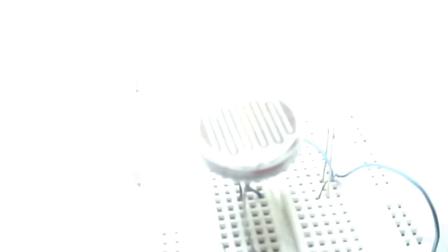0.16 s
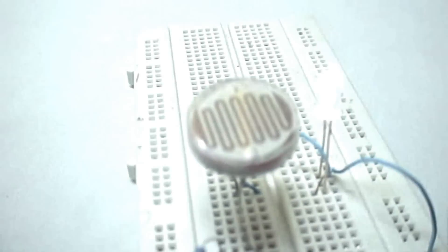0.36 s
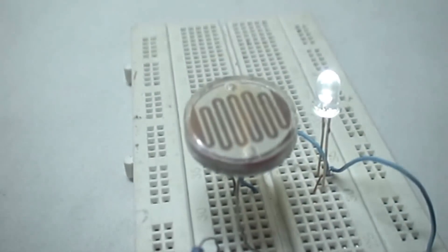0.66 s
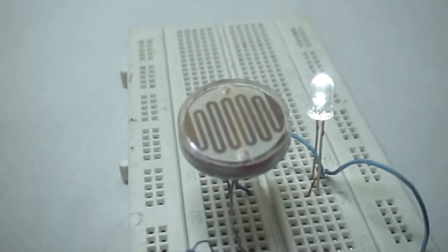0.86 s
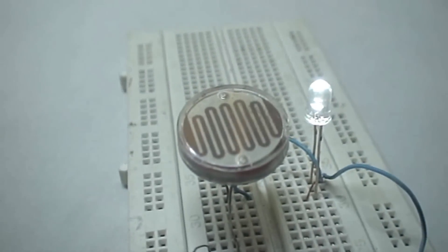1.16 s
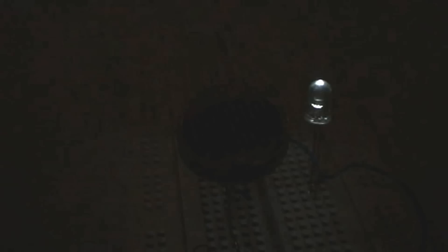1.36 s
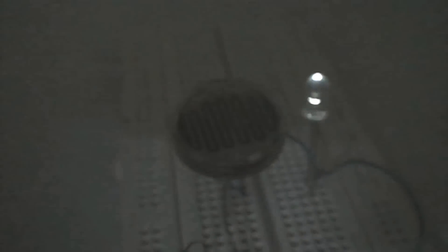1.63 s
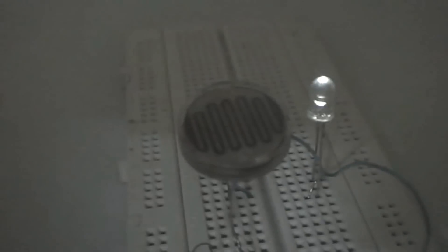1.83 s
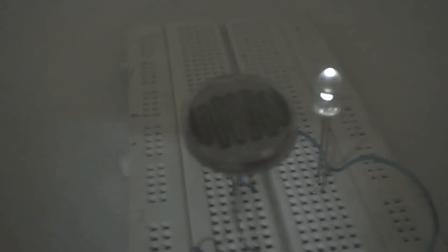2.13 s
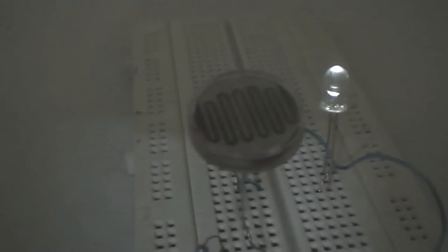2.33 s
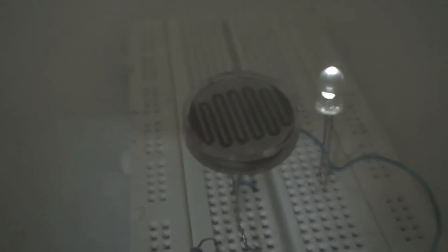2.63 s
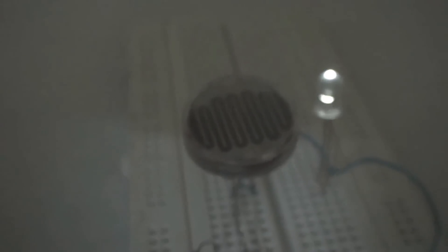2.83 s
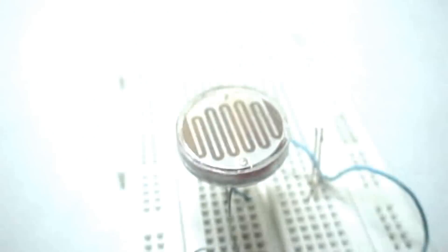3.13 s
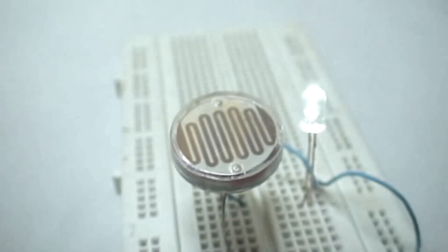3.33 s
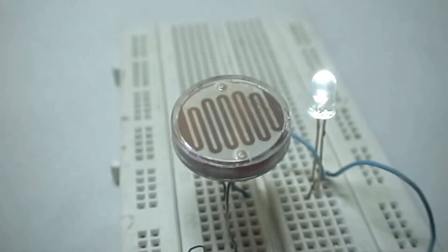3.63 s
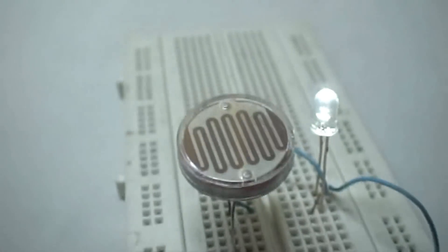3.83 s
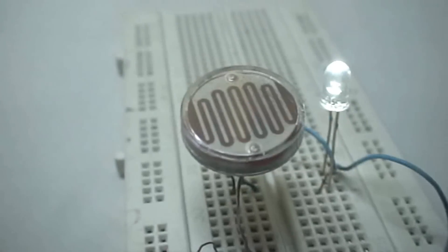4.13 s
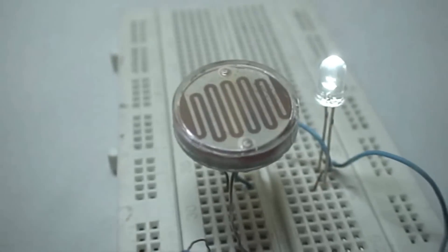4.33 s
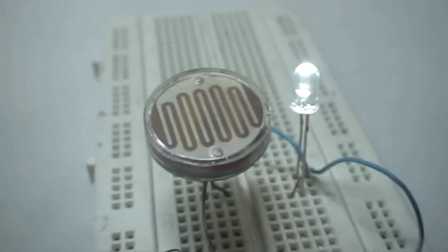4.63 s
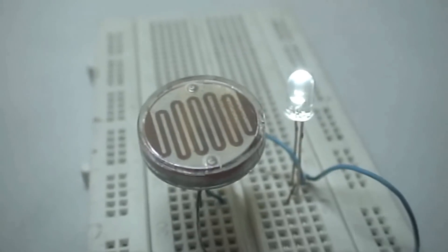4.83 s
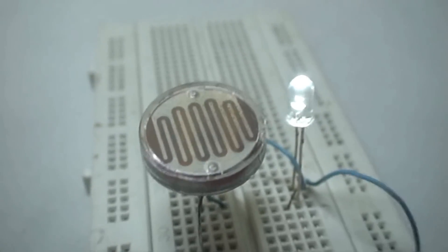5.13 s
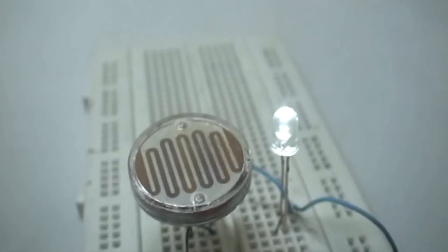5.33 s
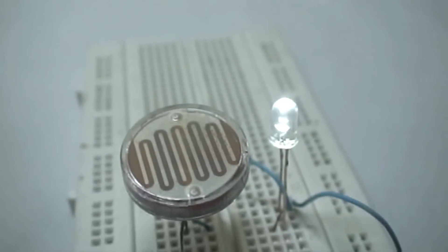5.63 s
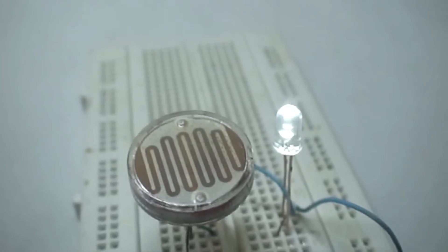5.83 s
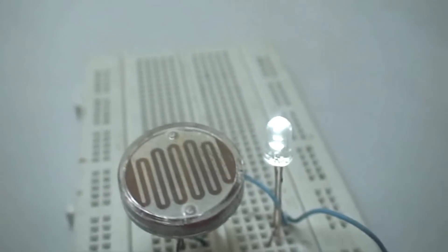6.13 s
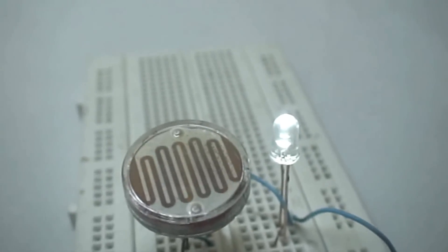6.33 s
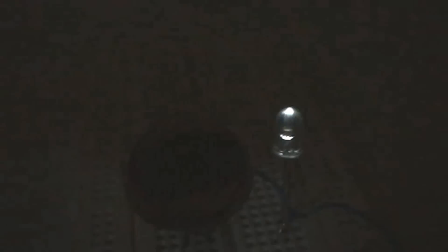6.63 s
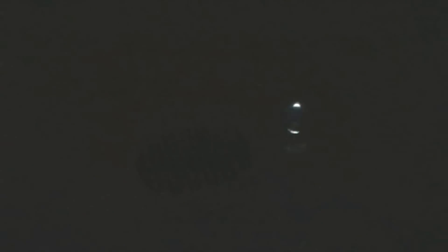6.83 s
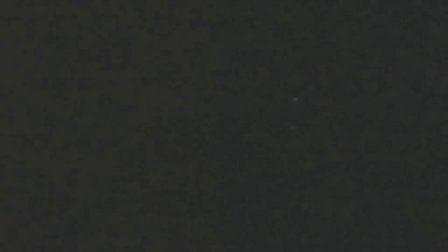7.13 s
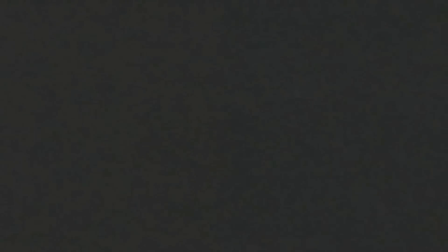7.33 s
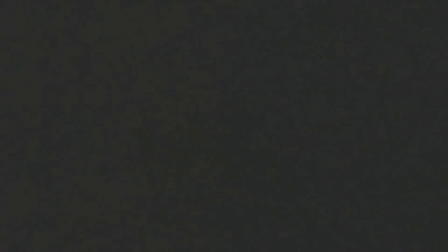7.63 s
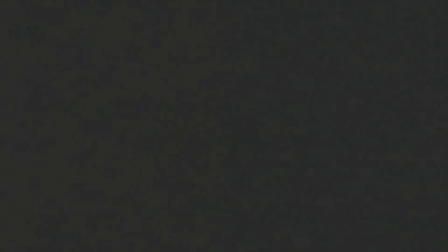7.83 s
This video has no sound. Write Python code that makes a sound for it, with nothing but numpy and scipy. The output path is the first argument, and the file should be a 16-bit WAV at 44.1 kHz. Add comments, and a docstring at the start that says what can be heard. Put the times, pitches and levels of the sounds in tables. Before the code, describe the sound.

A small room hisses and hums softly for about eight seconds, with a small motor whining faintly throughout. At 0.2 seconds a light switch close to the microphone snaps on, sharp and bright, with a light thud of the hand on the wall. At 1.4 seconds it is eased off with a soft tick. It snaps on again at 3 seconds. After each snap the background dips slightly and creeps back. Small ticks and very faint plastic squeaks fall in between. Three different switches farther away clack at 4.4, 5.8 and 6.9 seconds, heard mostly as short room echo, the middle one loudest and slightly doubled. A faint low hum fades in around 5.1 seconds and out by 7.1. At about 6.7 seconds the near switch is eased off again, with soft ticks and dull bumps on its box. Only the hiss and whine remain.

```python
"""A small room hisses and hums softly, and a small motor whines all the way through.
A nearby light switch snaps on, is eased off, and snaps on again at 3 s, with ticks and knocks of the hand.
Each snap rattles the contacts and rings the switch; gain control then turns everything down for a while.
From 4.4 s three farther switches clack, heard mostly as room echo, and a low hum comes and goes.
Just before the last clack, the nearby switch is eased off again."""
import sys
import numpy as np
from scipy import signal
from scipy.fft import rfft, irfft
from scipy.io import wavfile
from scipy.ndimage import uniform_filter1d

SR = 44100
rng = np.random.default_rng(int(sys.argv[2]) if len(sys.argv) > 2 else 0)


def materialize(psi):
    """Save the field psi as 16-bit PCM at rate SR to the path in sys.argv[1].

    A 1-D psi becomes a single channel; in a 2-D psi each row is a channel.
    """
    bounded = np.clip(np.atleast_2d(psi).T, -1, 1)
    quanta = np.round(bounded * 32767).astype(np.int16)
    wavfile.write(sys.argv[1], SR, quanta)


N = 352359
HIT_SAMPLES = 32768
# time and frequency axes: for the whole scene, and for a single hit
SCENE_T, SCENE_HZ = np.arange(N) / SR, np.fft.rfftfreq(N, 1 / SR)
HIT_T, HIT_HZ = np.arange(HIT_SAMPLES) / SR, np.fft.rfftfreq(HIT_SAMPLES, 1 / SR)

# how left and right differ; the top treble is the same in both:
# (frequency [Hz], part a quarter cycle ahead [dB], unrelated part [dB])
LEFT_RIGHT_DIFFERENCE = [(60.6, -20, -19.5), (182, -5.5, -15), (430, 0, -5), (975, -0.5, -6),
                         (2010, -3, -1), (3160, 0.5, -12.5), (5000, -6.5, -2), (7500, -1, -13.5),
                         (10700, -9, 2.5), (12500, -39, -37)]
# echoes off the nearby desk and wall: (frequency [Hz], level [dB])
DESK_ECHO = [(150, 14.5), (400, 2.5), (1000, -0.5), (3000, 1.5), (5000, -4.5), (7000, -8), (15000, -6.5)]
# the room's echo: (frequency [Hz], time to fade by 60 dB [s], level [dB])
ROOM_ECHO = [(120, 0.68, 0), (496, 0.23, 4), (2000, 0.32, 1), (5000, 0.32, -1), (9000, 0.3, -2),
             (15000, 0.22, 0.5)]

# the hiss of the room's air: (frequency [Hz], relative level [dB])
AIR_SPECTRUM = [(15, -64), (25, -23), (75, -5.5), (129, -3.5), (198, -3.5), (227, -9.5), (349, -8),
                (378, -11), (582, -10), (1340, -16.5), (1450, -18.5), (1570, -18), (3340, -25.5),
                (9550, -30.5), (15500, -26.5)]
# steady tones of appliances: (pitch [Hz], level [dB], waver [Hz])
APPLIANCE_TONES = [(130.8, -67.5, 5.38), (594, -76, 14.57), (14300, -91, 5)]
# the motor's whine at its usual speed: (pitch [Hz], level [dB], waver [Hz])
MOTOR_TONES = [(1428, -69.3, 1.4), (1464, -76.5, 3.14), (14260, -81, 15)]
# the motor briefly speeds up: (time of the peak [s], half length [s], extra speed [fraction])
MOTOR_SURGES = [(1.646, 0.2207, 0.00904), (5.347, 0.218, 0.0119)]

# faint squeaks and rubs: (time [s], length [s], pitch [Hz], level [dB], width [Hz])
PLASTIC_SQUEAKS = [(2.158, 0.1, 4860, -73, 110), (4.21, 0.25, 2180, -65.5, 450),
                   (5.248, 0.1, 5200, -74, 260)]
# the hand thuds into the wall: (time [s], level [dB], treble tilt [dB per octave])
WALL_THUDS = [(0.164, -47.5, -1.5), (1.414, -50.5, -3), (3.019, -44, 0), (3.068, -46.5, -3),
              (6.535, -56, -3), (6.690, -50.5, -2.5)]
# the wall's modes, the pitches it rings at: (pitch [Hz], level [dB], time to fade by 60 dB [s])
WALL_MODES = [(69.4, -4.5, 0.32), (108, 1, 0.26), (168.3, -2, 0.22), (311, -0.5, .08), (395, 1, 0.08)]
# the hand bumps a switch box: (time [s], level [dB], pitch [Hz])
BOX_BUMPS = [(0.165, -43, 410), (5.821, -41.5, 366), (6.731, -35.5, 343), (6.81, -42.5, 409)]
# how the box rings: (multiple of the bump's pitch [ratio], level [dB], time to fade by 60 dB [s])
BOX_MODES = [(.55, -7, 0.086), (1, 2.5, 0.034), (1.4, -14, .03)]

# the far switches clack:
# (time [s], level [dB], treble tilt [dB per octave], lead-in compared with clack [dB], switch [index])
FAR_CLACKS = [(4.4074, -28.5, 0.8, -12, 0), (5.8116, -23.5, 1, -10.5, 1), (5.8280, -33, 0.5, -21, 1),
              (6.9318, -32.5, 1.3, -12, 2)]
# how far switches 0, 1 and 2 ring: (pitch [Hz], width [Hz], level [dB])
HOLLOW_SWITCH_MODES = [(330, 70, -10.0), (670, 160, -20.0), (980, 70, -13.0), (1340, 150, -8.0),
                       (1620, 70, -11.5), (2100, 140, -4.0), (2290, 70, -6.0), (2700, 100, -5.0),
                       (3340, 90, -1.5), (3610, 110, -1.5), (4810, 190, -10.0), (5640, 540, -17.5),
                       (6890, 640, -14.0), (8360, 230, -4.0), (8780, 110, -5.5), (9410, 380, -10.5),
                       (12140, 240, -17.0), (13270, 490, -20.0)]
HARD_SWITCH_MODES = [(350, 70, -6.5), (620, 80, -6.0), (920, 70, -11.5), (1430, 250, -6.5),
                     (1760, 70, -6.0), (2180, 300, -4.0), (2720, 340, -8.0), (3350, 110, -3.0),
                     (3720, 220, -8.5), (4350, 340, -4.0), (4920, 490, -10.0), (6280, 410, -6.0),
                     (7020, 300, -8.5), (7510, 350, -10.5), (8220, 80, -4.0), (8940, 510, -5.5),
                     (10310, 500, -11.0), (11770, 460, -11.5), (13270, 650, -11.5), (15060, 800, -16.0)]
LIGHT_SWITCH_MODES = [(290, 90, -12.5), (600, 160, -15.5), (1360, 220, -10.5), (1690, 120, -9.0),
                      (2320, 170, -5.5), (2780, 70, -5.0), (3060, 260, -8.0), (3810, 130, -6.0),
                      (4050, 130, -10.0), (5340, 510, -17.0), (7150, 390, -13.5), (8370, 280, -3.0),
                      (9280, 100, -11.0), (9580, 250, -10.0), (11680, 100, -21.0), (12580, 540, -18.0)]

# soft ticks near the switch; the first is a short echo of the snap:
# (time [s], level [dB], treble tilt [dB per octave], ping pitch [Hz], ping level [dB])
SOFT_TICKS = [(0.1834, -49, -4, 4800, -6), (0.2707, -46.5, 0, 1610, 10), (1.0467, -54, -0.5, 3680, 3),
              (1.4180, -45.5, 2, 1780, 8), (1.6435, -52.5, -3, 2100, -8), (2.9456, -55, 0, 2300, -15),
              (3.1375, -49, -1, 13400, 17), (3.5488, -54, 0.5, 3570, 9), (6.6969, -41, 2.3, 1890, 6),
              (6.8003, -43, -1, 4050, 3.5)]
# how the rocker, the part you press, rings: (pitch [Hz], width [Hz], level [dB])
ROCKER_MODES = [(400, 240, 4), (980, 160, 4), (1500, 490, 1), (1780, 390, -2), (2260, 190, 4.5),
                (2950, 290, -3), (3650, 330, -9.5), (4260, 370, -7.5), (5800, 500, -16.5), (6580, 480, -5),
                (8500, 1100, -12.5), (10400, 500, -42), (12200, 1400, -18)]
# the near switch snaps on: (time [s], level [dB], treble tilt [dB per octave], contact bounce [s])
NEAR_SNAPS = [(0.1604, -20.5, -0.14, 0.0057), (3.0169, -19.5, 0.1, 0.0044)]
# how a snap rings: (pitch [Hz], width [Hz], level in first snap [dB], level in second snap [dB])
SNAP_MODES = [(400, 80, -11.5, -13.5), (860, 70, -16.0, -12.5), (1030, 150, -9.0, -11.0),
              (1360, 70, -7.0, -7.5), (1610, 180, -16.0, -11.5), (2370, 270, -14.0, -14.5),
              (2680, 70, -10.0, -5.0), (3000, 140, -9.0, -9.0), (3250, 70, -11.0, -26.0),
              (3760, 360, -13.5, -12.0), (4190, 90, -15.5, -13.0), (4520, 130, -6.0, -6.0),
              (4870, 170, -3.0, -7.5), (5250, 190, -9.5, -10.5), (6380, 130, -12.0, -9.0),
              (6840, 140, -5.0, -7.5), (7680, 500, -13.5, -12.0), (8670, 180, -10.0, -13.0),
              (10120, 720, -11.5, -16.0), (10340, 220, -11.0, -3.0), (11750, 440, -18.5, -14.0),
              (12000, 250, -16.5, -12.5), (12730, 270, -3.0, -12.0), (13320, 280, -8.5, -7.0),
              (14250, 300, -13.5, -12.0), (15880, 880, -13.5, -16.0)]


def amp(db):
    """Turns decibels into a factor to multiply by."""
    return 10 ** (np.asarray(db) / 20)


def unit_rms(x):
    """Scales a signal so that its average strength (rms) is one."""
    return x / np.sqrt(np.mean(abs(x) ** 2) + 1e-30)


def look_up(table, hz, column=1):
    """Reads a table at any frequency, gliding between its rows."""
    columns = np.transpose(table)
    return np.interp(np.log(hz + 1), np.log(columns[0] + 1), columns[column])


def add(mix, start_s, sound):
    """Mixes a sound in at the given time."""
    part = mix[:, round(start_s * SR):][:, :sound.shape[1]]
    part += sound[:, :part.shape[1]]


def stereo(pair, hz, treble_pan_db):
    """Left and right spectra from a sound and its scattered twin; the treble can lean to one side."""
    middle, scattered = pair
    side = 1j * amp(look_up(LEFT_RIGHT_DIFFERENCE, hz)) * middle
    side += amp(look_up(LEFT_RIGHT_DIFFERENCE, hz, column=2)) * scattered
    shade = amp(treble_pan_db / 2 * np.exp(-((hz - 7000) / 4500) ** 4))  # by the microphones' casing
    return np.array([(middle + side) * shade, (middle - side) / shade])


def straight_ahead(pair):
    """Puts a sound (row 0) and its scattered twin (row 1) in front of the microphones."""
    return irfft(stereo(rfft(pair), SCENE_HZ, treble_pan_db=0), N)


def tone(hz, waver_hz, flutter=0.2):
    """A tone whose pitch wanders and whose strength flutters."""
    turns = np.arange(0, SCENE_T[-1] + 1, 0.03)
    drift, strength = (np.interp(SCENE_T, turns, row) for row in rng.standard_normal((2, len(turns))))
    phase = 2 * np.pi * np.cumsum(hz + waver_hz * drift) / SR
    return unit_rms((1 + flutter * strength) * np.sin(phase))


def motor(wander=0.002194, turn_s=0.2):
    """A small motor's tones rise and fall together with its speed."""
    drift = np.interp(SCENE_T / turn_s, np.arange(100), rng.standard_normal(100))
    surges = sum(extra * np.exp(-((SCENE_T - peak_s) / half_s) ** 2)
                 for peak_s, half_s, extra in MOTOR_SURGES)
    speed = 1 + wander * drift + surges
    return sum(amp(db) * tone(hz * speed, waver_hz) for hz, db, waver_hz in MOTOR_TONES)


def hum(start_s=5.13, end_s=7.1, fade_s=0.25, db=-62.5):
    """A low hum fades in, holds and fades out."""
    fade = np.clip(np.minimum(SCENE_T - start_s, end_s - SCENE_T) / fade_s, 0, 1)
    return amp(db) * fade * tone(hz=166.6, waver_hz=2.82)


def background(air_db=-57.5):
    """The steady hiss of the air, with the appliances, the motor and the hum."""
    noise = rfft(rng.standard_normal((2, N)))
    air = irfft(noise * amp(look_up(AIR_SPECTRUM, SCENE_HZ)), N)
    appliances = sum(amp(db) * tone(hz, waver_hz) for hz, db, waver_hz in APPLIANCE_TONES)
    out = amp(air_db) * unit_rms(air)
    out[0] += appliances + motor() + hum()
    return straight_ahead(out)


def squeaks():
    """An uneven grip on plastic makes it ring around one pitch in a short, scratchy chirp."""
    out = np.zeros((2, N))
    for start_s, length_s, hz, db, width_hz in PLASTIC_SQUEAKS:
        peak = 1 / (1 + ((SCENE_HZ - hz) / width_hz) ** 2)
        scratch = unit_rms(irfft(rfft(rng.standard_normal(N)) * peak, N))
        swell = np.sin(np.pi * np.clip((SCENE_T - start_s) / length_s, 0, 1))
        out[0] += amp(db) * swell * scratch
    return straight_ahead(out)


def ring(hz, db, fade_s, attack_s=0.0004):
    """One low mode is struck and dies away, losing 60 dB in fade_s."""
    onset = 1 - np.exp(-HIT_T / attack_s)
    return amp(db - 60 * HIT_T / fade_s) * np.sin(2 * np.pi * hz * HIT_T) * onset


def knocks():
    """The hand makes the wall thud and bumps the switch box."""
    out = np.zeros((2, N))
    for start_s, db, tilt_db in WALL_THUDS:
        thud = sum(ring(hz, db + mode_db + tilt_db * np.log2(hz / 150), fade_s)
                   for hz, mode_db, fade_s in WALL_MODES)
        add(out, start_s, np.outer([1, 0], thud))  # row 0 only: no scattered twin
    for start_s, db, hz in BOX_BUMPS:
        bump = sum(ring(hz * multiple, db + mode_db, fade_s) for multiple, mode_db, fade_s in BOX_MODES)
        add(out, start_s, np.outer([1, 0], bump))
    return straight_ahead(out)


def body_gain(modes, tilt_db, floor_db, bass_hz=75):
    """How strongly a switch rings at each frequency: peaks on a floor, tilted brighter or duller."""
    peaks = sum(amp(db) ** 2 / (1 + ((HIT_HZ - hz) / width_hz) ** 2) ** 2 for hz, width_hz, db in modes)
    bass_loss = HIT_HZ ** 4 / (HIT_HZ ** 4 + bass_hz ** 4)  # a small body gives off no deep bass
    tilt = amp(tilt_db * np.log2((HIT_HZ + 300) / 3000))
    return np.sqrt((peaks + amp(floor_db) ** 2) * bass_loss) * tilt


def ringing_filter(gain):
    """Spectrum of a filter with this shape that rings only after the hit, never before."""
    log_gain = np.log(np.maximum(unit_rms(gain), 1e-5))
    mirrored = np.r_[log_gain, log_gain[-2:0:-1]]
    return np.exp(signal.hilbert(mirrored).conj()[:len(log_gain)])


def contact_bounce(length_s):
    """Spectrum of contacts rattling for a few milliseconds, about equally strong at all pitches."""
    spectrum = rfft(rng.standard_normal((2, HIT_SAMPLES)))
    window = np.exp(-(HIT_T / length_s) ** 4)
    for _ in range(6):  # even out the spectrum, then cut the sound short again
        flat = spectrum / (abs(spectrum) + 1e-12)
        spectrum = rfft(irfft(flat) * window)
    return unit_rms(spectrum)


def echoes(fade_table, rise_s):
    """Spectrum of many echoes that build up and die away, each band at its own speed."""
    hz, t, bands = signal.stft(rng.standard_normal((2, HIT_SAMPLES)), SR, nperseg=256)
    fade = amp(-60 * t / look_up(fade_table, hz)[:, None])
    tail = signal.istft(bands * fade, SR, nperseg=256)[1][:, :HIT_SAMPLES]
    return unit_rms(rfft(tail * (1 - np.exp(-HIT_T / rise_s))))


def strike(body, db, bounce_s, desk_db, room_db, rise_s, pan_db):
    """One hit: a brief rattle rings the switch's body, then the desk and the room echo it."""
    desk = echoes([(1, 0.075)], rise_s=0.0027)  # all bands fade in 0.075 s
    desk *= amp(desk_db + look_up(DESK_ECHO, HIT_HZ))
    room = amp(room_db + look_up(ROOM_ECHO, HIT_HZ, column=2)) * echoes(ROOM_ECHO, rise_s)
    reflected = stereo(desk + room, HIT_HZ, treble_pan_db=-1.5)
    direct = stereo(contact_bounce(bounce_s), HIT_HZ, pan_db)
    delay_s = 0.003604 / (1 + (HIT_HZ / 1100) ** 2)  # low bending waves leave the plate later
    bending = np.exp(-2j * np.pi * np.cumsum(delay_s) * SR / HIT_SAMPLES)
    spectrum = unit_rms(direct + reflected) * ringing_filter(body) * bending
    sound = irfft(spectrum)[:, :HIT_SAMPLES // 2]
    return amp(db) * np.sqrt(SR / 100) * sound  # db is the level with the energy spread over 10 ms


def far_switches(lead_in_s=0.0048):
    """Switches across the room clack after a faint lead-in; their echo outweighs the direct sound."""
    out = np.zeros((2, N))
    # (modes, floor between them [dB])
    switches = [(HOLLOW_SWITCH_MODES, -30), (HARD_SWITCH_MODES, -19), (LIGHT_SWITCH_MODES, -30)]
    for start_s, db, tilt_db, lead_in_db, which in FAR_CLACKS:
        modes, floor_db = switches[round(which)]
        body = body_gain(modes, tilt_db, floor_db)
        for hit_s, hit_db in (start_s - lead_in_s, db + lead_in_db), (start_s, db):
            hit = strike(body, hit_db, bounce_s=0.0132, desk_db=-10.5, room_db=5.0,
                         rise_s=0.0086, pan_db=-4.5)
            add(out, hit_s, hit)
    return out


def soft_ticks(ping_width_share=0.1):
    """Soft ticks near the switch ring at the rocker's pitches, each with its own ping."""
    out = np.zeros((2, N))
    for start_s, db, tilt_db, ping_hz, ping_db in SOFT_TICKS:
        ping = (ping_hz, ping_width_share * ping_hz, ping_db)
        body = body_gain(ROCKER_MODES + [ping], tilt_db, floor_db=-33)
        tick = strike(body, db, bounce_s=0.0055, desk_db=1.0, room_db=-13.5, rise_s=0.017, pan_db=4.0)
        add(out, start_s, tick)
    return out


def near_snaps(lead_in_s=0.0027, lead_in_db=-22):
    """The near switch's contacts slam shut; a faint lead-in softens the start of each snap."""
    out = np.zeros((2, N))
    for snap, (start_s, db, tilt_db, bounce_s) in enumerate(NEAR_SNAPS):
        modes = np.array(SNAP_MODES)[:, [0, 1, 2 + snap]]  # pick this snap's level column
        body = body_gain(modes, tilt_db, floor_db=-23)
        for hit_s, hit_db in (start_s - lead_in_s, db + lead_in_db), (start_s, db):
            hit = strike(body, hit_db, bounce_s, desk_db=-1.5, room_db=-12.5, rise_s=0.017, pan_db=3.5)
            add(out, hit_s, hit)
    return out


def scene():
    """All the switches and the sounds of the hand, over the quiet room."""
    return near_snaps() + soft_ticks() + knocks() + squeaks() + far_switches() + background()


def gain_control(x, limit_db=-30, cut_share=0.33, duck_s=0.036, recover_db_per_s=1.0):
    """A loud sound turns the volume down; it creeps back over the next seconds."""
    power = uniform_filter1d((x ** 2).mean(0), 441)  # averaged over 10 ms
    excess_db = np.maximum(10 * np.log10(abs(power) + 1e-12) - limit_db, 0)
    recovery_db = recover_db_per_s * SCENE_T
    cut_db = np.maximum.accumulate(cut_share * excess_db + recovery_db) - recovery_db
    smoothing = np.exp(-1 / (duck_s * SR))
    return x * amp(-signal.lfilter([1 - smoothing], [1, -smoothing], cut_db))


def record(dry, bass_pan_db=-1.1, low_cut_hz=40, high_cut_hz=15950):
    """The bass leans right and loses its deepest part; gain control follows, then a top-treble cut."""
    lean_db = bass_pan_db / 2 / (1 + (SCENE_HZ / 280) ** 2)
    heard = irfft(rfft(dry) * amp([lean_db, -lean_db]), N)
    low_cut = signal.butter(2, low_cut_hz, "highpass", fs=SR, output="sos")
    high_cut = signal.firwin(511, high_cut_hz, window=("kaiser", 9), fs=SR)
    heard = gain_control(signal.sosfilt(low_cut, heard))
    return signal.oaconvolve(heard, high_cut[None], "same")


dry = scene()
out = record(dry)
materialize(out)
```